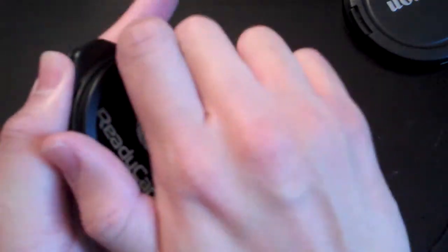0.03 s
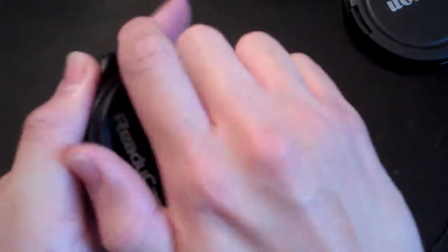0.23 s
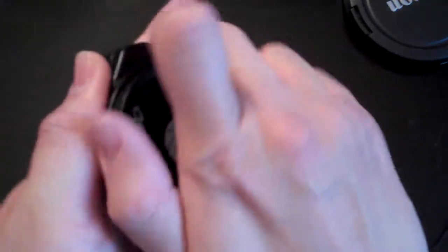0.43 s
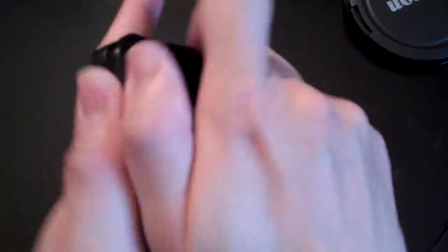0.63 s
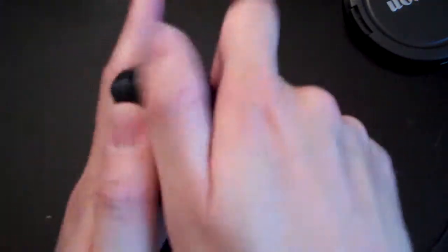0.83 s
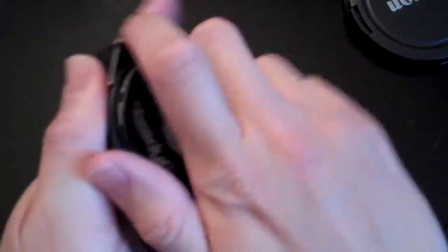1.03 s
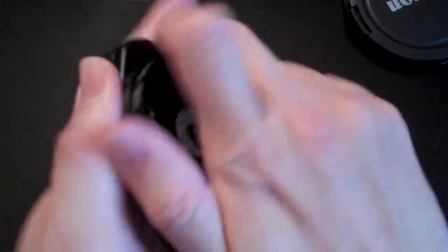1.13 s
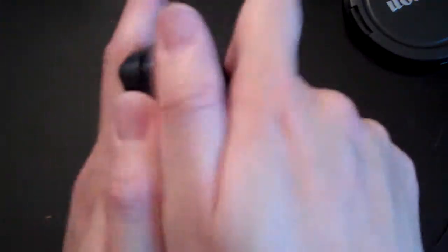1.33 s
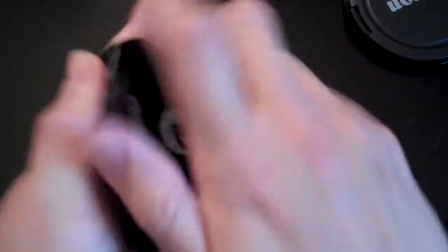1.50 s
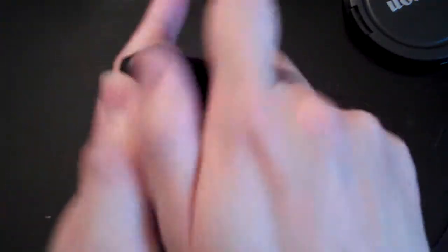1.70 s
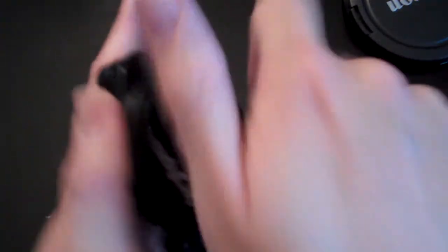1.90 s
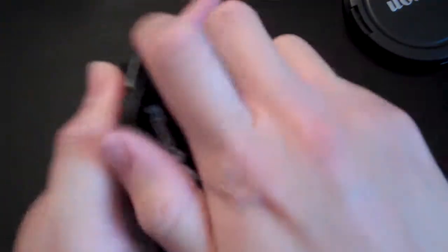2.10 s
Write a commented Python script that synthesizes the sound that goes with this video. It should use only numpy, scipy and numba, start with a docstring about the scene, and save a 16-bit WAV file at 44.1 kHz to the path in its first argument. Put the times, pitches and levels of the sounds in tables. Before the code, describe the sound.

A small threaded plastic ring is twisted in cupped hands, very close. A crisp click at 0.05 s, then a loud, clipped double snap at 0.21 s with a faint low thump. Soft dry rasps run from 0.5 to 0.9 s, then a near pause. Brighter scrapes with small ticks fill 1.2 to 2.0 s, with a strong click at 1.63 s. Quiet room noise, short reflections.

```python
"""Threaded ring twisted on a small holder

A threaded plastic ring is twisted on a small holder held in cupped hands, close to a microphone on a desk. The
threads rasp as dense tiny slips and snap as single clicks; both ring the same decaying body modes. A short
noise tail stands for desk and room, over quiet shaped room noise; the loudest snap overloads the recorder, and
the hands bump the holder with one low push."""
import sys
import numpy as np
from scipy import signal
from scipy.fft import rfft, irfft
from scipy.io import wavfile
from scipy.ndimage import uniform_filter1d
from numba import njit

SR = 44100
rng = np.random.default_rng(int(sys.argv[2]) if len(sys.argv) > 2 else 0)


def wav_record(signal):
    """Record a signal, one row per channel, as 16-bit PCM in the file named by sys.argv[1]."""
    frames = np.transpose(np.atleast_2d(signal))
    bounded = np.clip(frames, -1, 1)
    # unit amplitude maps onto the largest positive 16-bit level
    quanta = np.round(bounded * 32767).astype(np.int16)
    wavfile.write(sys.argv[1], SR, quanta)


def amplitude_ratio(level_db):
    """Convert a level in decibels to the matching linear amplitude (field) ratio."""
    exponent = np.asarray(level_db, float) / 20
    return 10 ** exponent


N = 94815


def at(table, hz):
    """Read a (Hz, value) table on a log-frequency axis."""
    table = np.array(table, float)
    return np.interp(np.log(np.maximum(hz, 1)), np.log(table[:, 0]), table[:, 1])


def unit(x):
    """Scale to rms 1."""
    return x / np.sqrt(np.mean(x ** 2))


def walk(rate_hz):
    """Random levels held 1 / rate_hz seconds, smoothed twice, rms 1."""
    hold = int(SR / rate_hz)
    steps = np.repeat(rng.standard_normal(N // hold + 1), hold)
    return unit(uniform_filter1d(uniform_filter1d(steps, hold), hold)[:N])


def pair(common, own, hz, lean, apart):
    """Left and right: a shared sound plus a part of opposite sign, the sum leaning to one side."""
    side = np.array([[1], [-1]])
    return (common + side * amplitude_ratio(at(apart, hz)) * own) * amplitude_ratio(side * at(lean, hz) / 2)


# Room noise spectrum. Each row: frequency in Hz, relative density in dB per Hz.
ROOM_SPECTRUM = [(12, -22), (20, 1), (287, -7), (525, -10), (602, -9.5), (986, -10.5), (3300, -13.5),
                 (3580, -16.5), (4230, -13.5), (12700, -29.5), (14100, -52)]
# Room noise lean. Each row: frequency in Hz, left minus right in dB.
ROOM_LEAN = [(30, 14), (125, 4.1), (300, 1.9), (4000, 2.5), (12000, 2.2)]
# Room noise width. Each row: frequency in Hz, unrelated part re shared part in dB.
ROOM_APART = [(30, -9.5), (200, -10), (1000, -4.5), (4000, -0.5), (12000, -1)]
# Background swell. Each row: time in seconds, level re ROOM_DB in dB.
ROOM_SWELL = [(0, 1.3), (.2, 0.2), (.3, -2.5), (.45, -3.5), (.7, -4), (.9, 2), (1.05, 1.5), (1.3, 1.5),
              (1.6, 2), (1.9, -0.5), (2.15, -0.9)]
ROOM_DB, ROOM_TOP_HZ = -57.5, 12300


def room_noise(t):
    """Shaped noise of room and handling, swelling as the hands move, more alike left and right in the bass."""
    hz = np.fft.rfftfreq(N, 1 / SR)
    shape = amplitude_ratio(at(ROOM_SPECTRUM, hz)) * (hz < ROOM_TOP_HZ)
    common = rfft(rng.standard_normal(N)) * shape
    own = rfft(rng.standard_normal(N)) * shape
    noise = unit(irfft(pair(common, own, hz, ROOM_LEAN, ROOM_APART), N))
    swell_db = np.interp(t, *np.array(ROOM_SWELL).T)
    return amplitude_ratio(ROOM_DB + swell_db + 0.5 * walk(9.07)) * noise


# Thread snaps. Each row: start in seconds, push level re SNAP_DB in dB, upper re lower modes in dB,
# slip length in ms, drive of the free rim re push in dB.
SNAPS = [(.0436, -35, 19, 1.8, -40), (.0453, -11.5, 3.5, 1.43, -39.5), (0.0577, -36.5, -2.5, 1.3, -35.5),
         (0.2098, -7.5, -5.5, 1.4, -42.5), (0.2131, 2, 6, 1.5, -38.5), (0.2153, -3.6, -15, 2.14, -33.5),
         (0.2167, -4, -16, 1.2, -44), (0.2243, -27.5, -6, 5.1, -40.5), (0.238, -36.5, 8.5, 2, -42.5),
         (0.3417, -31, -5.5, 2, -37.5), (.528, -43.5, -0.5, 2, -36.5), (0.554, -27.5, -1.5, 1.2, -37),
         (1.116, -39, -8, 5.7, -9), (1.1226, -21, -2.5, 3.1, -27.5), (1.1342, -18, -10.5, 2.2, -37),
         (1.2168, -29, -0.8, 2.5, -42), (1.227, -25, 4.5, 2.1, -37), (1.248, -23.5, 21.5, 4.1, -41),
         (1.36, -20, 6, 6.9, -40), (1.408, -20, 7, 2.3, -31), (1.5345, -24, 2, 5, -4),
         (1.547, -27, 3, 9, 2), (1.5683, -14, 7, 1.4, -8), (1.621, -24, 3, 3.5, -30),
         (1.6298, -3.5, 0, 1.85, -19), (1.683, -25, -7, 6.3, -27.5), (1.691, -19.5, -2.2, 2.3, -24.5),
         (1.752, -21, 1.5, 2.9, -30), (1.772, -19.5, 3.5, 2.4, -31.5), (1.8192, -20.5, -2, 1.76, -46.5),
         (1.9925, -18, -8.3, 5.4, -24.5), (2.018, -15.5, 2, 3.6, -8.5), (2.023, -24.5, -2.5, 7, -13.5)]
SNAP_DB, FIRST_SLIP_GAIN = -9, 2.3


def snaps(t):
    """Each snap is one firm slip and a few ms of crackle; returns push, index of the latest snap, rows."""
    rows, push = np.array(SNAPS, float), np.zeros(N)
    crackle = np.sign(rng.standard_normal(N))
    for start_s, db, _, length_ms, _ in rows:
        level = amplitude_ratio(db + SNAP_DB)
        age = np.maximum(t - start_s, 0) / (length_ms / 1000)  # in slip lengths
        push += level * np.minimum(age * 9, 1) * np.exp(-np.minimum(age, 9) ** 2) * crackle
        push[int(start_s * SR) + 8] += level * FIRST_SLIP_GAIN
    last = np.clip(np.searchsorted(rows[:, 0], t) - 1, 0, None)
    return push, last, rows


@njit
def ring(x, turn, keep):
    """One decaying mode whose pitch may move every sample."""
    y, z = np.empty(len(x)), 0j
    for i in range(len(x)):
        z = z * keep * np.exp(1j * turn[i]) + x[i]
        y[i] = z.imag
    return y


def mode(x, hz, t60_s):
    """Ring a mode; white excitation of rms 1 gives about rms 1."""
    keep = np.exp(-np.log(1000) / (t60_s * SR))
    turn = 2 * np.pi * hz / SR * np.ones(N)
    return ring(x, turn, keep) * np.sqrt(2 * (1 - keep ** 2))


# Lean of the near sound. Each row: frequency in Hz, left minus right in dB.
LEAN = [(1000, 2), (2000, 5.5), (4000, 4), (7000, 2.5), (12000, 2)]
# Width of the near sound. Each row: frequency in Hz, gain of the unrelated part in dB.
APART = [(1000, -23.5), (2000, -22.5), (5000, -11.5), (9000, -4.5), (13000, -9.5)]


def stereo_mode(common, own, hz, pitch_hz, t60_s):
    """Ring shared and unrelated excitation in one mode, placed left and right by its nominal frequency."""
    return pair(mode(common, pitch_hz, t60_s), mode(own, pitch_hz, t60_s), hz, LEAN, APART)


# Modes of ring and holder. Each row: frequency in Hz at GRIP_REST_HZ, level in dB, t60 in seconds.
BODY = [(830, -33.5, 0.0033), (1200, -42, 0.0027), (1566, -18, 0.011), (1616, -6, 0.02), (1780, -2, 0.022),
        (1862, -8.5, .06), (1920, -5, 0.033), (2440, -14, 0.0045), (3359, -5.5, 0.0082), (3665, -2, 0.014),
        (4400, -7, 0.0025), (5244, -1, 0.009), (6046, -6, 0.0019), (7053, -6, 0.0062), (8440, -10, 0.0025),
        (9610, -12, 0.0037), (10660, -13.5, 0.0019), (11600, -17, 0.002), (13000, -30.5, 0.004)]
# The grip squeezes the hollow between hands and holder.
# Each row: time in seconds, main resonance, near 1.8 kHz, in Hz.
GRIP = [(0, 1763), (.21, 1829), (.34, 1780), (.41, 1915), (.56, 1858), (.63, 1780), (.76, 1780),
        (.86, 1809), (1.12, 1848), (1.25, 1806), (1.36, 1829), (1.46, 1824), (1.54, 1853), (1.63, 1855),
        (1.76, 1838), (1.85, 1837), (1.93, 1890), (2.02, 1902)]
# Fingers damp or free the modes from 3 to 4.1 kHz. Each row: time in seconds, rub gain in dB.
FINGERS = [(.33, 0.9), (.56, 0.5), (.65, -2.5), (.73, -1.5), (.8, 1.5), (1.25, 2), (1.36, 2.5), (1.45, 0.5),
           (1.55, 2.5), (1.76, -1.5), (1.8, -5), (1.88, -6.5), (1.93, -1)]
GRIP_REST_HZ = 1820
DRIFT_RMS, SNAP_DETUNE_RMS = .012, .008  # fractions of the pitch
SNAP_SCATTER_DB, PATCHY_DB = 1.5, 2.5  # rms


def body(t, push, last, rows, rasp, press, bright):
    """Slips and snaps ring every mode; the grip shifts the modes, the fingers damp some of them."""
    out = 0
    fingers_db = np.interp(t, *np.array(FINGERS).T)
    grip = np.interp(t, *np.array(GRIP).T) / GRIP_REST_HZ
    for k, (hz, db, t60_s) in enumerate(BODY):
        upper = np.clip(np.log2(hz / 1900) / 1.22, 0, 1) - .5  # -.5 low modes, +.5 high modes
        chance = rng.standard_normal((len(rows), 2))[last]  # new draw at each snap
        pitch_hz = hz * grip * (1 + DRIFT_RMS * walk(18) + SNAP_DETUNE_RMS * chance[:, 0])
        rub_db = upper * bright + fingers_db * (3000 < hz < 4100) + PATCHY_DB * walk(45.035)
        rub = press * amplitude_ratio(rub_db)
        hit = push * amplitude_ratio(upper * rows[last, 2] + SNAP_SCATTER_DB * chance[:, 1])
        common = rasp * rub + hit
        # a shifted rasp serves as unrelated slips
        own = np.roll(rasp, 4001 * (k + 1)) * rub + rng.standard_normal(N) * np.abs(hit)
        out = out + (-1) ** k * amplitude_ratio(db) * stereo_mode(common, own, hz, pitch_hz, t60_s)
    return out


# Thin rim, singing on when the fingers leave it free. Each row: frequency in Hz, level in dB, t60 in seconds.
RIM = [(8823, 0, .11), (11440, -3, .08), (9787, -16, .07)]
TWIST_RIM_DB = -32


def rim(push, last, rows, rasp, press):
    """Long high modes, driven by each snap as far as the rim is free and faintly by the rasp."""
    out = 0
    drive = push * amplitude_ratio(rows[last, 4]) + rasp * press * amplitude_ratio(TWIST_RIM_DB)
    for hz, db, t60_s in RIM:
        own = rng.standard_normal(N) * np.abs(drive)
        out = out + amplitude_ratio(db) * stereo_mode(drive, own, hz, hz, t60_s)
    return out


THUMP_S, THUMP_LENGTH_S, THUMP_DB = .2138, 0.0076, -33.5


def thump(t):
    """The hands bump the holder at the loudest snap: one short low push, 8 dB stronger on the left."""
    age = np.clip((t - THUMP_S) / THUMP_LENGTH_S, 0, 1)
    return amplitude_ratio(THUMP_DB) * np.sin(np.pi * age) ** 2 * amplitude_ratio(np.array([[4.], [-4.]]))


SLIPS_PER_S, SLIP_SPREAD_DB = 14000, 1.5
RUB_LOW_HZ = 1394  # tiny slips hardly move the lowest modes


def slips():
    """Dense tiny slips of random sign and moderately varied size, high-passed."""
    hit = rng.random(N) < SLIPS_PER_S / SR
    size = rng.standard_normal(N) * amplitude_ratio(SLIP_SPREAD_DB * rng.exponential(size=N))
    highpass = signal.butter(2, RUB_LOW_HZ, "highpass", fs=SR, output="sos")
    return signal.sosfilt(highpass, unit(hit * size))


# Twists, one list each. Each row: time in seconds, pressure re TWIST_DB in dB, upper re lower modes in dB.
TWISTS = [
    [(0.325, -49, -3), (0.329, -61.5, -9), (0.341, -38.5, -7.9), (0.401, -41, -14.7), (0.425, -82.5, -16.3)],
    [(0.51, -76.5, -7), (0.532, -45, -13), (0.544, -68.5, 8.2), (0.556, -31, -5), (0.576, -40.5, -11.5),
     (0.6, -70, -10)],
    [(0.605, -49.5, -0.8), (0.627, -30.5, -2.7), (0.657, -27.5, 3.2), (0.677, -32.5, -1), (0.69, -49, -20)],
    [(0.69, -37.5, -8), (0.714, -30, 4.7), (0.768, -37.5, -2.5)],
    [(0.768, -42.5, -3), (0.796, -28, 4.3), (0.818, -25.5, -3.5), (0.826, -21, -4.1), (0.852, -35, -4.3),
     (0.862, -55.5, -3), (0.885, -59, -4)],
    [(0.9, -60.5, -5.5), (0.912, -66, -16), (0.974, -53, -10), (0.992, -67, -3.5), (1.026, -51.5, -7),
     (1.042, -74.5, 0.1), (1.05, -75.5, 0.1)],
    [(1.205, -66, -10), (1.217, -35.5, -10), (1.229, -34, 3.4), (1.235, -44.5, -12.5), (1.245, -24.5, 4.9),
     (1.34, -26.5, 4.1)],
    [(1.34, -30, 12.5), (1.368, -21, 3.4), (1.378, -24.5, 3.5), (1.45, -28.5, -3), (1.47, -55, -12),
     (1.48, -57, 7)],
    [(1.525, -61, 9), (1.537, -25, -2.1), (1.551, -26, 6.2), (1.561, -39, 2.2), (1.571, -25, 5.7),
     (1.615, -52.5, -7)],
    [(1.74, -60, -22), (1.754, -24.5, 3.7), (1.776, -23, 4.1), (1.85, -29.5, 2.3)],
    [(1.85, -25.5, 5.2), (1.925, -29, -4.2)],
    [(1.925, -31, -7.1), (1.985, -59.5, -15)],
]
TWIST_DB = -6


def twists(t):
    """Pressure (as gain) and brightness (dB) of the rubbing threads, linear in dB between rows."""
    press, bright = np.zeros(N), np.zeros(N)
    for rows in TWISTS:
        time_s, press_db, bright_db = np.array(rows, float).T
        on = (t >= time_s[0]) & (t < time_s[-1])
        press[on] = amplitude_ratio(np.interp(t[on], time_s, press_db) + TWIST_DB)
        bright[on] = np.interp(t[on], time_s, bright_db)
    return press, bright


SMALL_HZ, TOP_HZ = 702, 12570


def holder(t):
    """Snaps and rasp ring body and rim; a small body radiates no bass, the microphone fades at the top."""
    push, last, rows = snaps(t)
    press, bright = twists(t)
    rasp = slips()
    out = body(t, push, last, rows, rasp, press, bright) + rim(push, last, rows, rasp, press)
    band = signal.butter(3, [SMALL_HZ, TOP_HZ], "bandpass", fs=SR, output="sos")
    return signal.sosfilt(band, out)


TAIL_DB, TAIL_T60_S, TAIL_DELAY_S, TAIL_APART = -16, 0.11, 0.0037, .3


def desk_and_room_tail(near, t):
    """Reflections off desk and walls: convolution with delayed, decaying noise, mostly shared left and right."""
    age_s = t[:SR // 4]
    tail = rng.standard_normal((2, len(age_s))) * amplitude_ratio(-60 * age_s / TAIL_T60_S) * (age_s > TAIL_DELAY_S)
    tail[1] = tail[0] + TAIL_APART * tail[1]
    tail = tail / np.sqrt(np.sum(tail ** 2, axis=1, keepdims=True))
    return amplitude_ratio(TAIL_DB) * signal.fftconvolve(near, tail, axes=1)[:, :N]


def scene():
    """The holder, its short tail off desk and walls, the room and the thump."""
    t = np.arange(N) / SR
    near = holder(t)
    return near + desk_and_room_tail(near, t) + room_noise(t) + thump(t)


CLIP = 1.05


def band_limit(x):
    """A steep low-pass at the top of the band."""
    return signal.sosfilt(signal.butter(12, 14290, fs=SR, output="sos"), x)


def record(dry):
    """The recorder input clips on the loudest snap."""
    mix = np.clip(dry, -CLIP, CLIP)
    return band_limit(mix)


dry = scene()
out = record(dry)
wav_record(out)
```